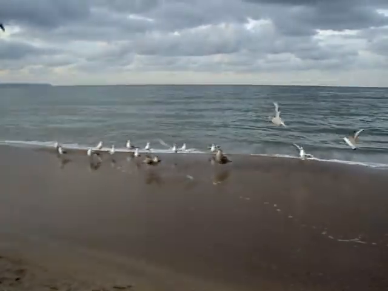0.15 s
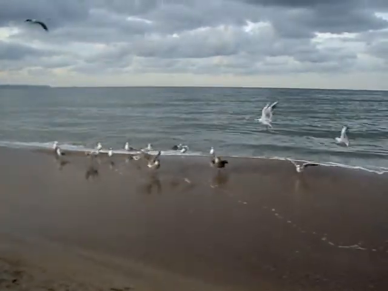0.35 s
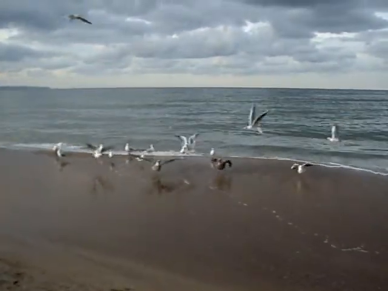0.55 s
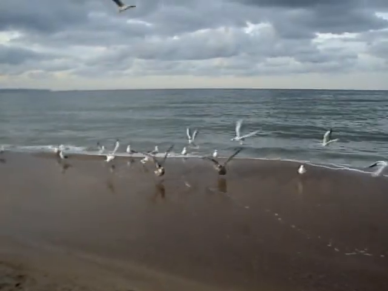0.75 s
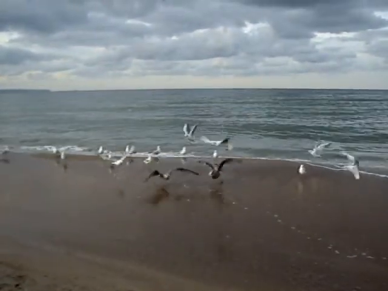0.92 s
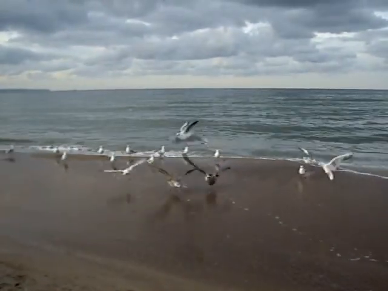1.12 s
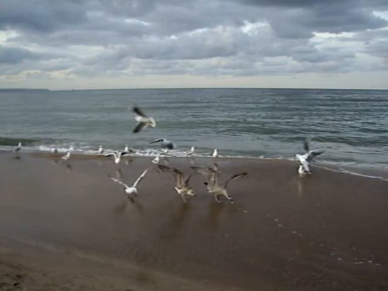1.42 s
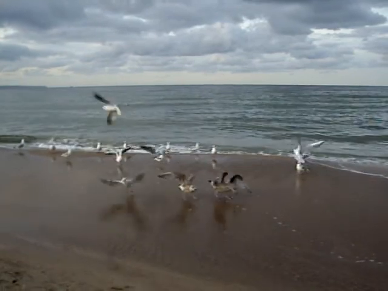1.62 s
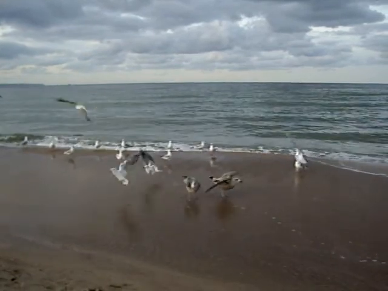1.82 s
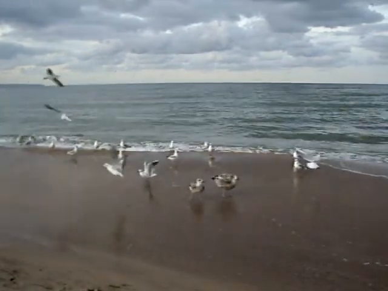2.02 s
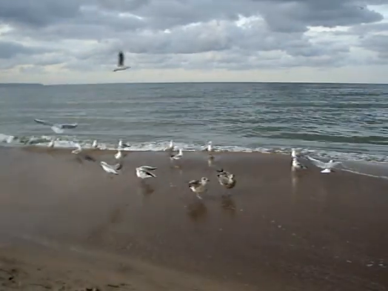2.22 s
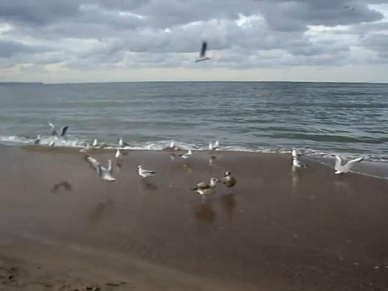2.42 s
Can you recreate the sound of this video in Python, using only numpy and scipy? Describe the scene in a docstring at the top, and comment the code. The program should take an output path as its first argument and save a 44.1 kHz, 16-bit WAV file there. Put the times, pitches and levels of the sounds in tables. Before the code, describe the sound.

Thin piercing gull cries and short raspy squawks on a beach, with waves washing behind

```python
"""Gulls squabble on a wet beach: thin overlapping squeals from roughened near-sines, and short harsh rasps
from air noise ringing in throat resonances. Behind them lie the wash of the surf and a low rumble of wind and
far breakers, both banded noise. A small camera microphone hears it; twice its signal jumps with a soft thump."""
import sys
import numpy as np
from scipy import signal
from scipy.fft import next_fast_len
from scipy.io import wavfile

SR = 44100
rng = np.random.default_rng(int(sys.argv[2]) if len(sys.argv) > 2 else 0)


def log_audio(samples):
    """Write samples as a 16-bit WAV file to the path given in sys.argv[1]."""
    # one column per channel
    frames = np.atleast_2d(samples).T
    # limit to full scale, then quantise
    limited = np.clip(frames, -1, 1)
    pcm = np.round(limited * 32767).astype(np.int16)
    wavfile.write(sys.argv[1], SR, pcm)


N = 112454  # length in samples, about 2.55 s


def from_db(db):
    """Turn dB into gain."""
    return 10 ** (np.asarray(db) / 20)


def rms_one(x):
    """Scale to rms 1."""
    return x / np.sqrt(np.mean(x ** 2) + 1e-20)


def drift(rate_hz):
    """Random wander of rms 1: noise twice through a one-pole low-pass."""
    pole = np.exp(-2 * np.pi * rate_hz / SR)
    noise = rng.standard_normal(N + SR)
    wander = signal.lfilter([1], [1, -2 * pole, pole * pole], noise)
    return rms_one(wander[SR:])  # drop the first second, while the filter settles


def level(curve):
    """Draw a (t/s, level/dB) curve as gain."""
    return from_db(np.interp(np.arange(N) / SR, *np.transpose(curve)))


def resonance(x, hz, width_hz):
    """Ring a signal in a two-pole resonance applied twice, at rms 1."""
    pole = np.exp(-np.pi * width_hz / SR)
    b = [1, 0, -1.075]
    a = [1, -2 * pole * np.cos(2 * np.pi * hz / SR), pole * pole]
    return rms_one(signal.lfilter(b, a, signal.lfilter(b, a, x)))


def banded_noise(spectrum, per_octave, flicker_db):
    """Noise shaped band by band at rms 1; the bands flicker partly together, partly each alone."""
    hz, db = np.transpose(spectrum)
    edge_count = int(per_octave * np.log2(hz[-1] / hz[0])) + 2
    edges = hz[0] * 2 ** (np.arange(edge_count) / per_octave)
    white = rng.standard_normal((2, N + 4000))
    together = drift(19.0)
    total = np.zeros(N)
    for k, centre in enumerate(np.sqrt(edges[1:] * edges[:-1])):
        band_db = np.interp(np.log(centre), np.log(hz), db)
        flicker = flicker_db * (3.1 * together + drift(22.0))
        band_pass = signal.butter(2, edges[k:k + 2], "band", fs=SR, output="sos")
        # neighbouring bands draw on different noise
        total += from_db(band_db + flicker) * signal.sosfilt(band_pass, white[k % 2])[4000:]
    return rms_one(total)


# loudness of the low rumble: (t/s, level/dB)
RUMBLE_LEVEL = [(0.0, -37), (0.54, -38), (1.51, -30), (2.27, -31.5), (2.38, -29.5), (2.55, -37.5)]
# tone colour of the low rumble: (f/Hz, relative level/dB per Hz)
RUMBLE_SPECTRUM = [(20, 0), (60, -0.5), (125, -1), (250, -5)]


def wind_rumble():
    """Wind and far breakers: low banded noise with a slight flicker, riding a slow level curve."""
    return level(RUMBLE_LEVEL) * banded_noise(RUMBLE_SPECTRUM, per_octave=1.954, flicker_db=0.15)


# loudness of the wash: (t/s, level/dB)
WASH_LEVEL = [(0.0, -35), (0.51, -33.5), (0.99, -31), (1.34, -32), (2.06, -29.5), (2.55, -31.5)]
# tone colour of the wash: (f/Hz, relative level/dB per Hz)
WASH_SPECTRUM = [(250, -15), (450, -12.5), (800, -10), (1300, -13.5), (2050, -17), (2600, -15), (3400, -24),
                 (4200, -25), (5000, -21), (6000, -32.5)]


def surf_wash():
    """Breaking water: a smooth wash of banded noise, riding a slow level curve."""
    return level(WASH_LEVEL) * banded_noise(WASH_SPECTRUM, per_octave=3, flicker_db=0.4)


# sudden jumps of the signal: (t/s, level/dB, direction and its scale -1 to 1)
THUMPS = [(0.82, -14, -0.73), (1.63, -18.5, 1)]
THUMP_RISE_S, THUMP_FADE_S = 0.0016, 0.083  # time constants


def thumps():
    """Soft thumps: the signal jumps quickly to one side and sinks back more slowly."""
    t = np.arange(N) / SR
    out = np.zeros(N)
    for start, db, direction in THUMPS:
        since = np.maximum(t - start, 0)
        rise = 1 - np.exp(-since / THUMP_RISE_S)
        out += direction * from_db(db) * rise * np.exp(-since / THUMP_FADE_S)
    return out


# throat resonances in the order main, low, upper, top: (f/Hz, width/Hz)
THROAT = [(3197, 600), (2000, 1200), (4200, 630), (5337, 1060)]
# harsh cries: (start t/s, length t/s, level/dB, pulse depth 0-1,
# then low, upper and top throat resonance, each level/dB beside the main one)
RASPS = [(0, 0.015, -26.5, 0.24, -9.5, -8, -26.5), (0.13, 0.068, -27, 0.85, -12, -13.5, -16.5),
         (0.202, 0.077, -22.5, 0.81, -36, -1, -6), (.35, 0.11, -33, 0.35, -18, 7, -6.5),
         (0.408, 0.094, -26, .3, 10, 4.5, -1), (0.538, 0.045, -30, 0.25, 1.5, 1, -6.5),
         (0.678, 0.075, -22.5, 0.83, -0.5, 0.5, -5.5), (0.778, 0.036, -24.5, 0.78, -1.5, 3, -1.5),
         (0.921, 0.061, -19.5, 0.39, -7.5, -6.5, -6.5), (0.992, 0.047, -34, 0.32, 6, -9, -15),
         (1.048, 0.097, -19.5, 0.74, -20, -21, -10), (1.142, 0.099, -26, 0.28, 5, 10.5, -23),
         (1.189, 0.084, -26.5, 0.47, -8, -6, -1), (1.373, 0.06, -23, .5, -4, -1.5, -7),
         (1.429, 0.074, -18.5, 0.84, -14.5, -0.5, -23), (1.653, 0.083, -23, 0.64, -8, -5.5, -19.5),
         (2.03, 0.058, -26.5, 0.78, -5, -6, -19), (2.284, 0.023, -28.5, 0.59, -3, -0.5, -10)]
RASP_PULSES_PER_S, RASP_JITTER = 109, 0.04  # jitter: rms wander of the log rate
RASP_EDGE = 0.4  # rise and fall, each as a share of the length
RASP_EVEN = 0.13  # how far the ringing is steadied from hiss (0) towards a tone (1)


def rasps():
    """Harsh cries: air noise rings in four throat resonances, chopped by slightly uneven throat pulses."""
    rate = RASP_PULSES_PER_S * np.exp(RASP_JITTER * drift(37.0))
    rings = [resonance(rng.standard_normal(N), hz, width_hz) for hz, width_hz in THROAT]
    rings = signal.hilbert(rings, next_fast_len(N))
    rings = rings.real / np.abs(rings) ** RASP_EVEN  # even out the ringing's own envelope
    out = np.zeros(N)
    for start, length, db, depth, *others_db in RASPS:
        i = np.arange(int(start * SR), int((start + length) * SR))
        progress = np.linspace(0, 1, len(i))
        swell = np.sin(np.pi / 2 * np.clip(np.minimum(progress, 1 - progress) / RASP_EDGE, 0, 1))
        pulses = 1 - depth * np.cos(np.pi * np.cumsum(rate[i]) / SR) ** 2
        voice = from_db([0, *others_db]) @ rings[:, i]
        out[i] += from_db(db) * rms_one(voice * pulses) * swell
    return out


# squeal tones, one list of points each; some are high overtones or parts of a longer cry:
# (t/s, pitch f/Hz, level/dB)
SQUEALS = [
    [(0.36, 2610, -34), (0.374, 2720, -27.5), (0.384, 2940, -28)],
    [(0.39, 2526, -43.5), (0.414, 2504, -19), (0.426, 2430, -14.5), (0.479, 2390, -23)],
    [(0.475, 3340, -28), (0.487, 3140, -24), (0.536, 3290, -22), (0.541, 3130, -24), (0.56, 3210, -36)],
    [(0.57, 3070, -37), (0.58, 3074, -26.5), (0.602, 2990, -19), (0.638, 2968, -18), (0.669, 3160, -26)],
    [(0.718, 3240, -34), (0.74, 3170, -29.5), (0.763, 3280, -27)],
    [(0.81, 3240, -15), (0.818, 3206, -11.5), (0.836, 3280, -11.5), (0.874, 3360, -11), (0.885, 3390, -17)],
    [(0.888, 3214, -10), (0.896, 3168, -16), (0.918, 2920, -16.5), (0.94, 2890, -19.5), (0.996, 3014, -17),
     (1.008, 3300, -27)],
    [(0.885, 4120, -28), (0.892, 4105, -14.5), (0.941, 4243, -16), (0.952, 4510, -26)],
    [(0.945, 2340, -22.5), (0.974, 2375, -22)],
    [(0.977, 4238, -34), (1.041, 4053, -16), (1.051, 3890, -31)],
    [(1.01, 3020, -21.5), (1.04, 2817, -20.5), (1.056, 2340, -34)],
    [(1.012, 3440, -24), (1.022, 3380, -18), (1.032, 3308, -25), (1.054, 3208, -7.5), (1.092, 3152, -14),
     (1.099, 3000, -4)],
    [(1.102, 3057, -18.5), (1.114, 2988, -30), (1.12, 3047, -22), (1.126, 3025, -24.5),
     (1.136, 3145, -20.5), (1.165, 3040, -21.5)],
    [(1.064, 2455, -20), (1.084, 2370, -26.5)],
    [(1.104, 2354, -15), (1.116, 2300, -16.5), (1.13, 2520, -11)],
    [(1.152, 2286, -16), (1.158, 2285, -13.5), (1.168, 2070, -18), (1.192, 2210, -19), (1.198, 2230, -32)],
    [(1.152, 5360, -26), (1.196, 5200, -31.5)],
    [(1.178, 3185, -23), (1.214, 3130, -16.5), (1.231, 3110, -25)],
    [(1.22, 2566, -33), (1.23, 2475, -28.5), (1.256, 2453, -22.5), (1.276, 2230, -33.5)],
    [(0.384, 4780, -36.5), (0.404, 4800, -33)],
    [(1.114, 5490, -31), (1.131, 5530, -27)],
]
# voice of each squeal tone, same order: (hoarseness level/dB, octave overtone level/dB), both beside the tone
SQUEAL_VOICES = [(-13, -12.5), (-9, -10), (-7.5, -40), (-10, -22), (-2, -35), (-15, -47), (-7.5, -22.5),
                 (-7.5, -49), (-5, -13.5), (-3.5, -37), (-13, -14), (-15.5, -29), (0, -33.5), (-1, -21),
                 (-8.5, -17), (-10, -23), (-5, -37.5), (-8.5, -30), (-6.5, -11), (-2, -40), (-5, -39)]
SQUEAL_AIR_DB = -33  # rms of the airy hiss beside the tone's peak
SQUEAL_EDGE_S = 0.002  # fade at either end
WAVER_HZ = 11  # rms wander of the pitch
HOARSE_HZ = 240  # corner of the random shake
FLUTTER_HZ, FLUTTER_WANDER = 255.6, 0.087  # wander: rms of the log rate
FLUTTER_DB = -6.5  # throat flutter beside the random shake
OVERTONE_ROUGH_DB = -9  # the overtone's additional shake


def squeals():
    """Thin squeals: wavering near-sines with octaves, shaken into a noisy skirt and fluttering side partials."""
    waver = WAVER_HZ * drift(100.0)
    air = from_db(SQUEAL_AIR_DB) * resonance(rng.standard_normal(N), 5900, 1400)
    # two complex shakes, so that both loudness and phase roughen
    shake = np.array([drift(HOARSE_HZ) + 1j * drift(HOARSE_HZ) for _ in range(2)]) / np.sqrt(2)
    flutter_rate = FLUTTER_HZ * np.exp(FLUTTER_WANDER * drift(12.57))
    flutter = from_db(FLUTTER_DB) * np.sqrt(2) * np.cos(2 * np.pi * np.cumsum(flutter_rate) / SR)
    out = np.zeros(N)
    for k, (points, (hoarse_db, overtone_db)) in enumerate(zip(SQUEALS, SQUEAL_VOICES)):
        s, hz, db = np.transpose(points)
        i = np.arange(int(s[0] * SR), int(s[-1] * SR))
        t = i / SR
        phase = 2 * np.pi * np.cumsum(np.interp(t, s, hz) + waver[i]) / SR
        overtone_shake = 1 + from_db(OVERTONE_ROUGH_DB) * shake[1 - k % 2, i]
        overtone = from_db(overtone_db) * np.exp(2j * phase) * overtone_shake
        hoarseness = 1 + from_db(hoarse_db) * (shake[k % 2, i] + flutter[i])
        tone = (np.exp(1j * phase) + overtone) * hoarseness
        edge = np.clip(np.minimum(t - t[0], t[-1] - t) / SQUEAL_EDGE_S, 0, 1)
        loudness = np.sqrt(2) * from_db(np.interp(t, s, db))  # a plain sine gets its level as rms
        out[i] += edge * loudness * (tone.imag + air[i])
    return out


def scene():
    """Mix rumble, surf, thumps and gulls into one channel."""
    return (wind_rumble() + surf_wash() + thumps() + rasps() + squeals())[None]


DIP_HZ, DIP_HALF_HZ = 3770, 165  # a narrow band missing around 3.77 kHz: centre, half width
MIC_TOP_HZ, CEILING, CUTOFF_HZ = 6050, 0.71, 15800  # CEILING is a sample value


def record(dry):
    """Cut a narrow dip, lose the treble steeply, clip peaks at a hard ceiling, then cut the very top."""
    dip_edges = [DIP_HZ - DIP_HALF_HZ, DIP_HZ + DIP_HALF_HZ]
    dip = signal.butter(4, dip_edges, "bandstop", fs=SR, output="sos")
    treble_loss = signal.ellip(12, 0.3, 75, MIC_TOP_HZ, fs=SR, output="sos")
    top_cut = signal.cheby2(12, 70, CUTOFF_HZ, fs=SR, output="sos")
    heard = signal.sosfilt(treble_loss, signal.sosfilt(dip, dry))
    return signal.sosfilt(top_cut, np.clip(heard, -CEILING, CEILING))


dry = scene()
out = record(dry)
log_audio(out)
```